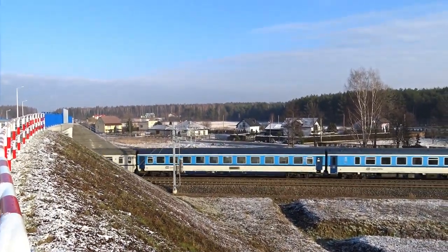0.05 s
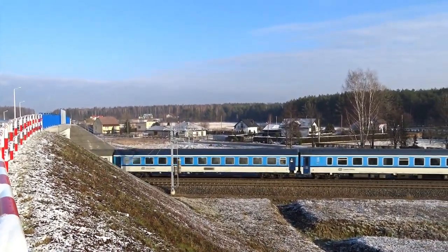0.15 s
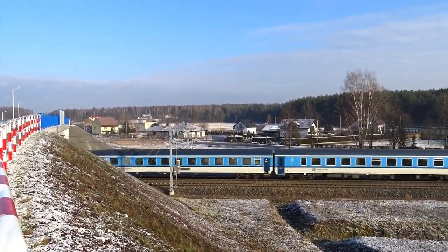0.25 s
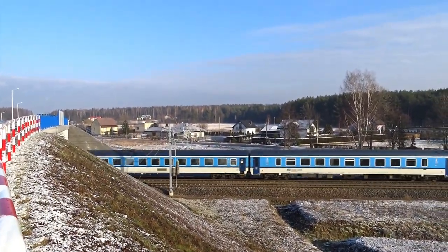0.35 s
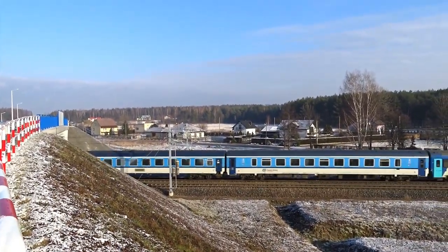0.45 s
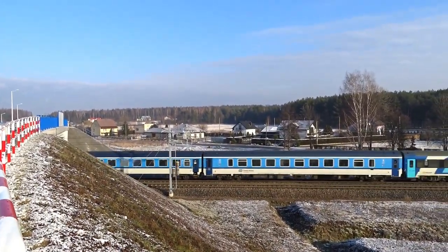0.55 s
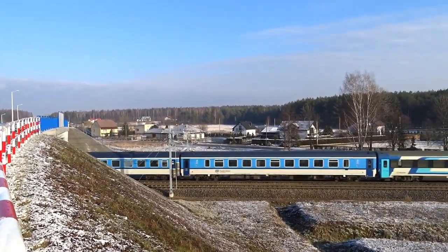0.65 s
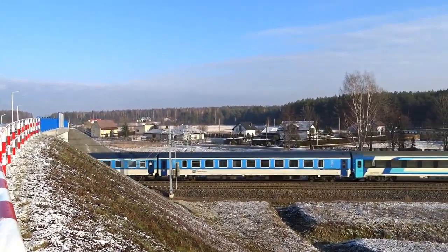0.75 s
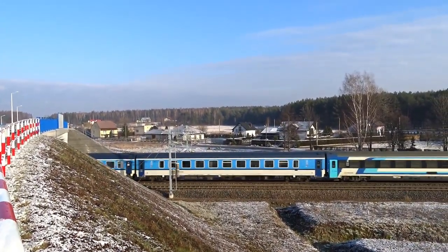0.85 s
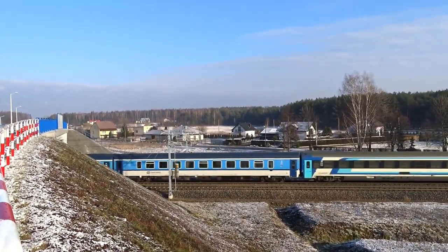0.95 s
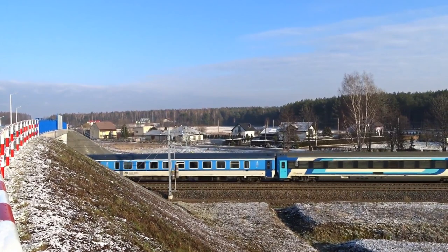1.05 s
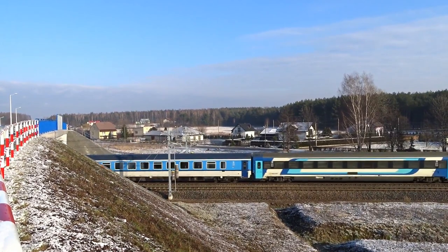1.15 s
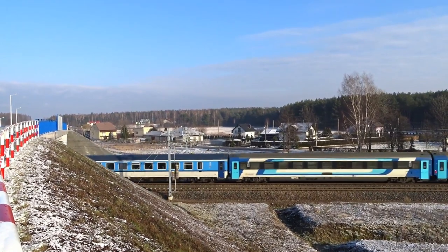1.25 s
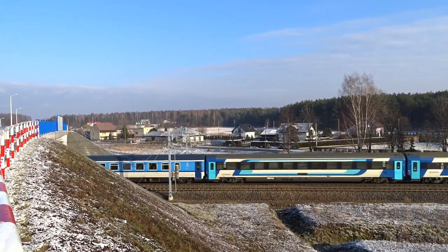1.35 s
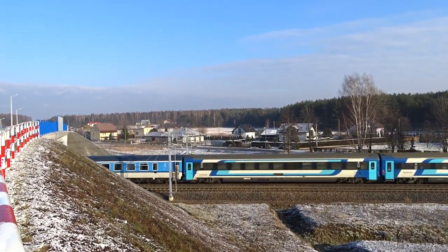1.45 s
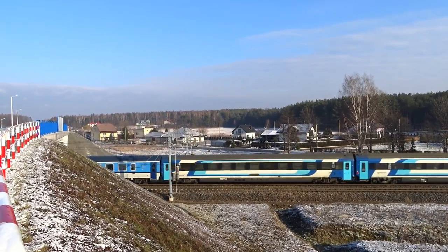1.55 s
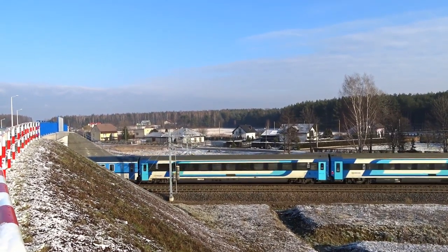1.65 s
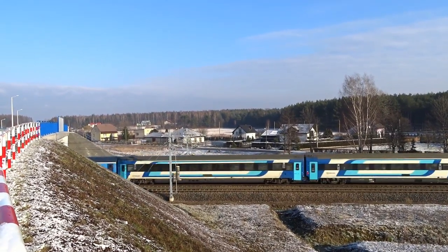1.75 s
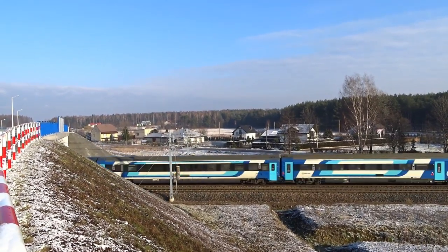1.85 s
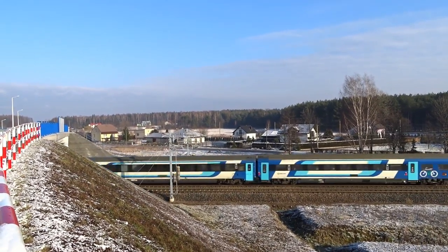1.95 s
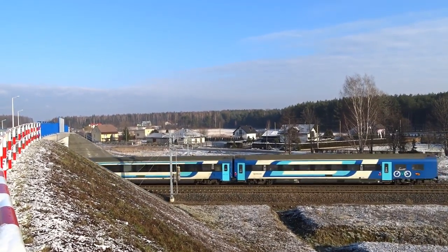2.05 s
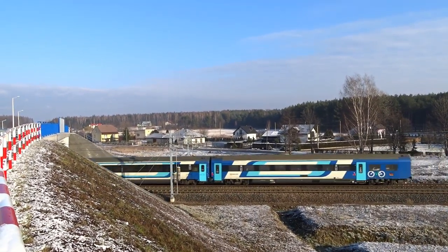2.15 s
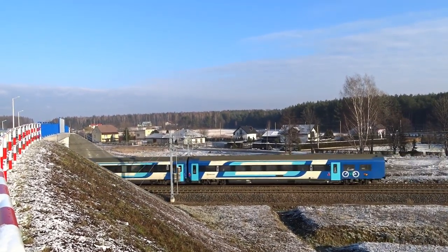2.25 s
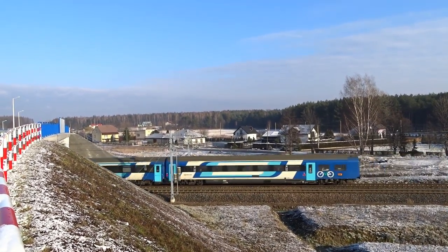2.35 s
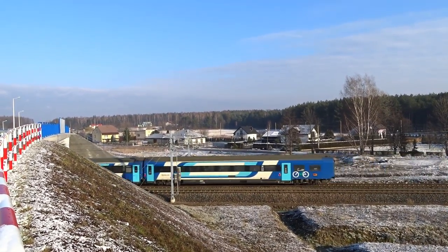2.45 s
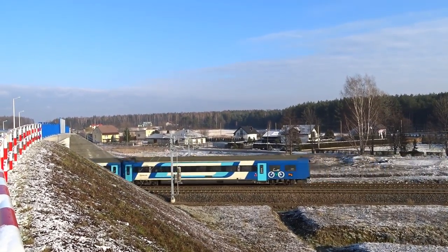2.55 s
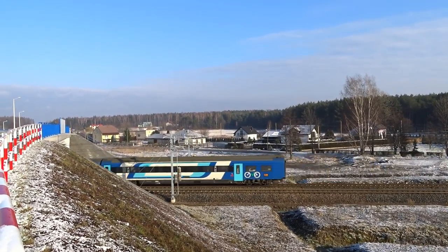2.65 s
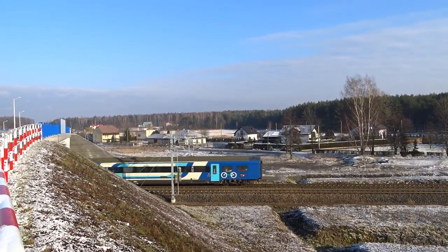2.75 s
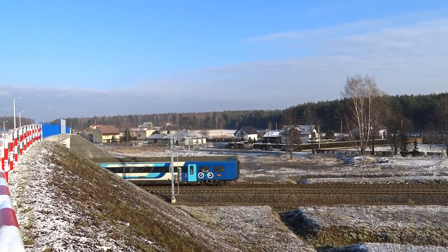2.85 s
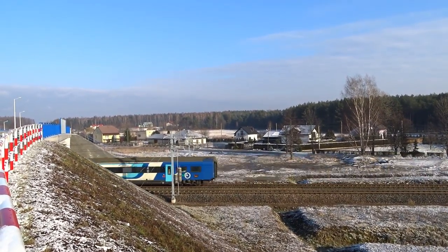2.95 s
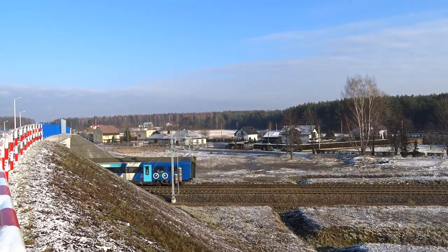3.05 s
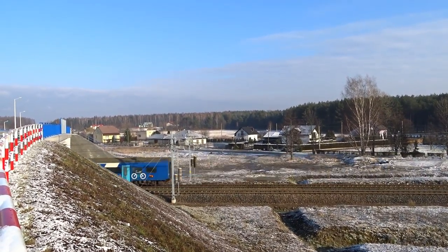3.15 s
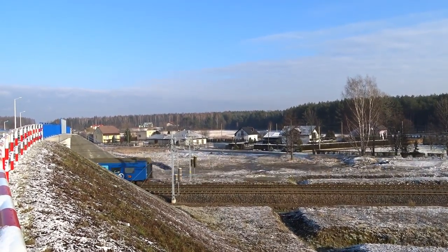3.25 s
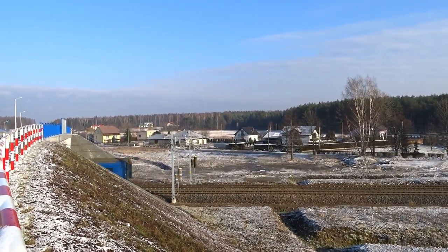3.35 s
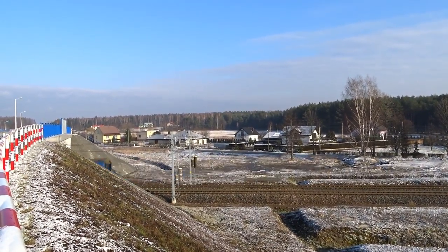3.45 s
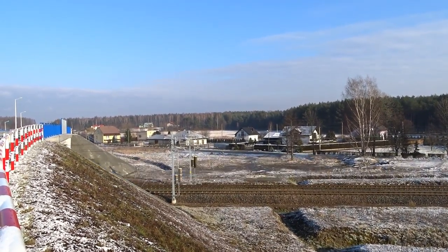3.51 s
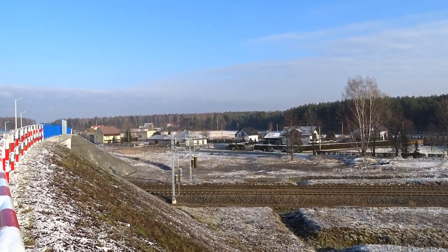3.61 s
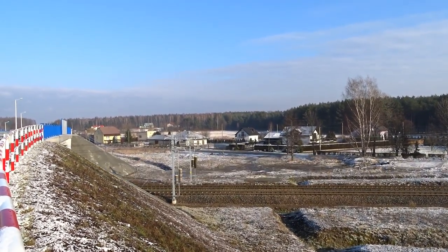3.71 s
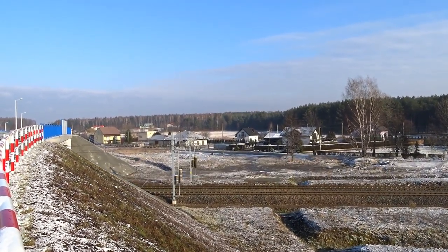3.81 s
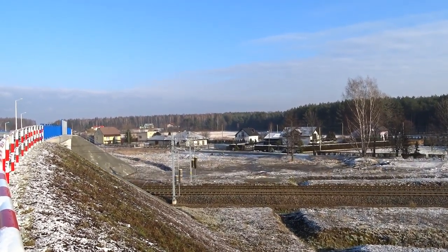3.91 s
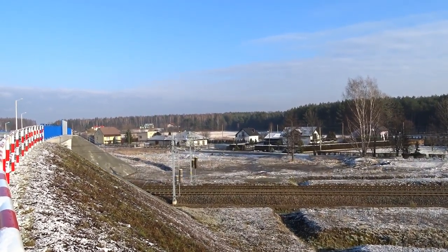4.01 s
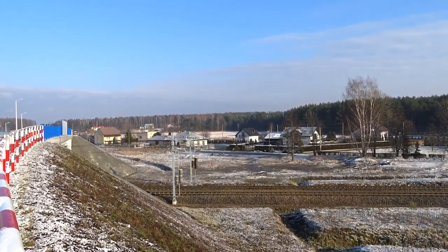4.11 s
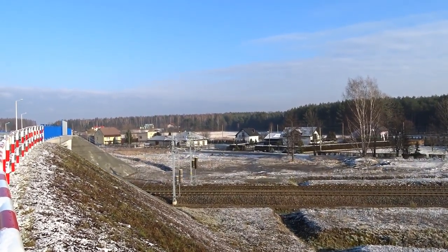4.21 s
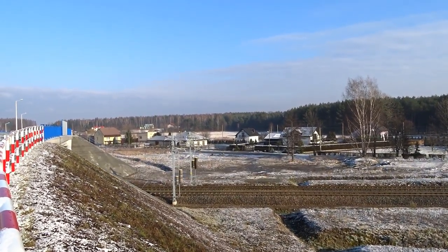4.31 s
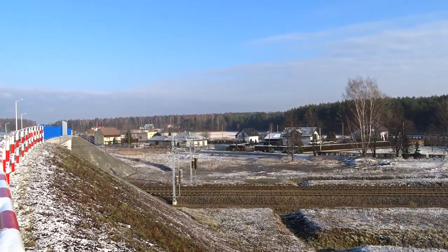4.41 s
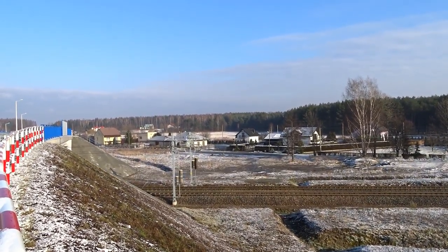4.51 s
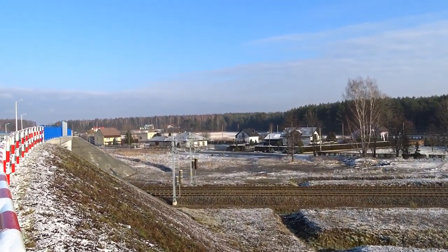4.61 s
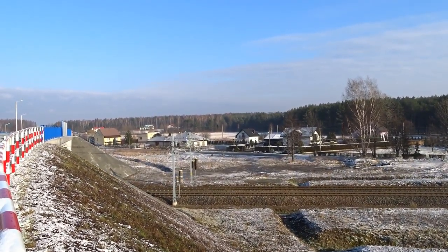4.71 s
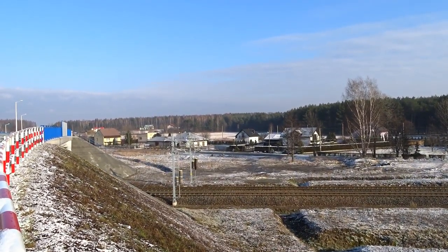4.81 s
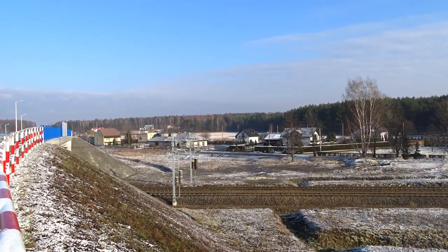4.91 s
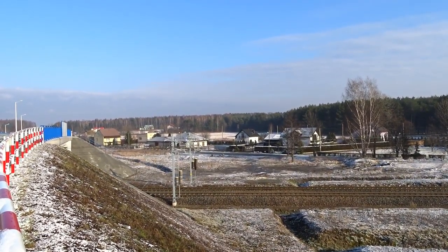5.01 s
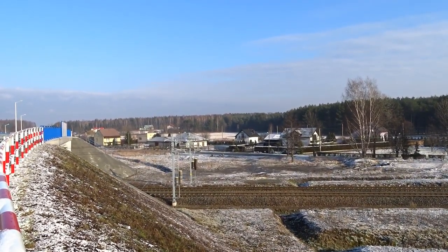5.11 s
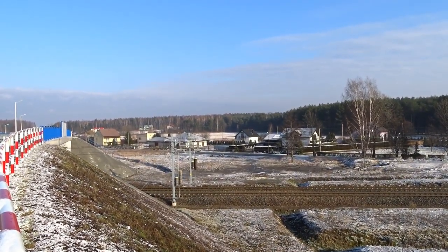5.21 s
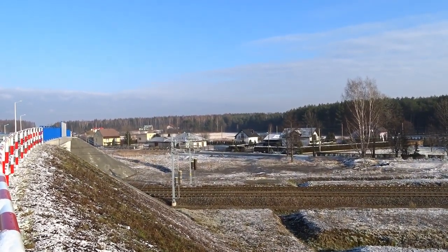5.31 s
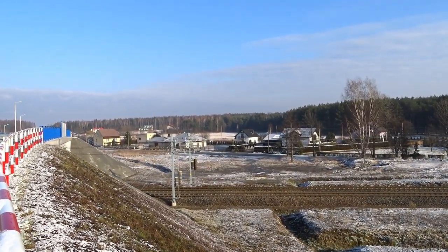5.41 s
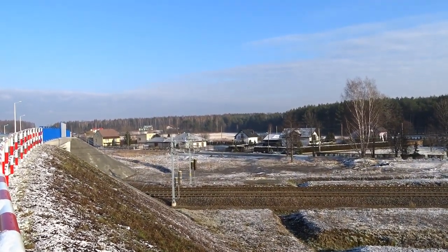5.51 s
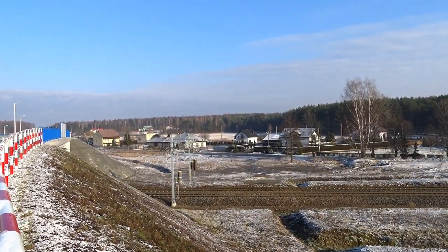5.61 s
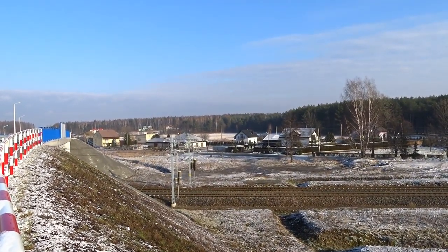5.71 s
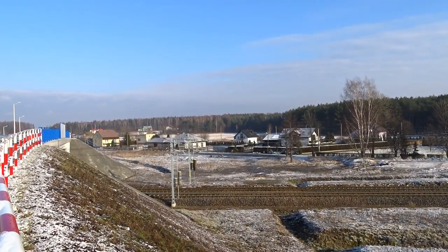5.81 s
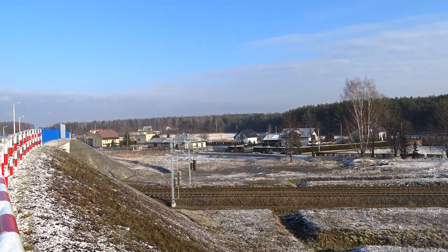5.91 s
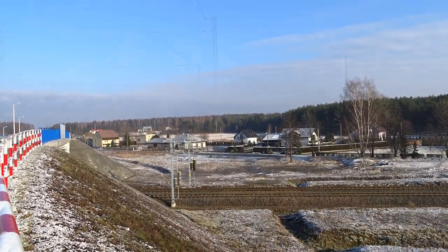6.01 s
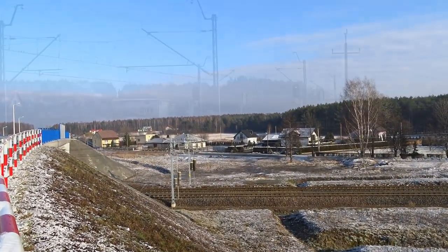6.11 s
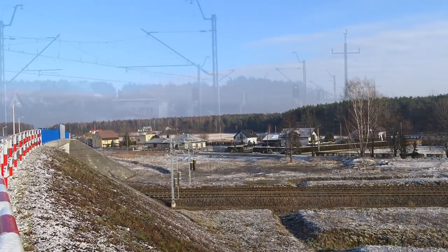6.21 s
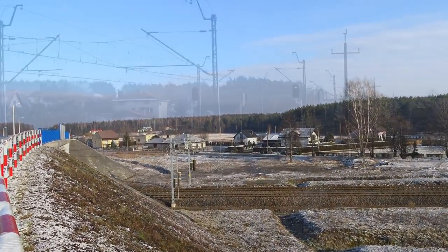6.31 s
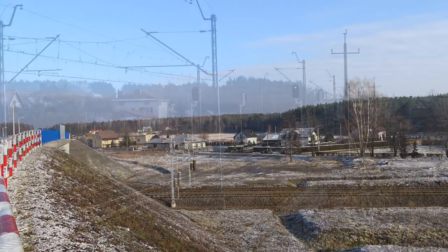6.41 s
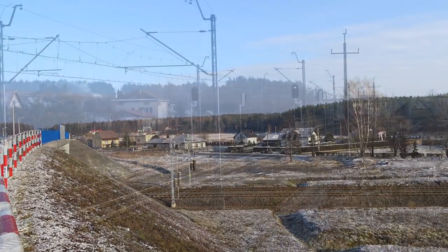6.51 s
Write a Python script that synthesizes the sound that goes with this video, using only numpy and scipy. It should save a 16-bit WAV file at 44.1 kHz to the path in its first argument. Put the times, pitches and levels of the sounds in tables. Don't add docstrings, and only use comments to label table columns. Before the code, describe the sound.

From the start a fast train is in full passage across open ground, heard from a moderate distance with a stereo microphone. Until about 1.8 seconds older coaches give a boomy, rough mid-low roar under dense bright wheel hiss; then newer coaches sound less boomy, with clearer metallic ringing around two kilohertz. Individual axles hum and wheel discs give brief faint squeals and howls, sagging in pitch. The noise stays loud and slightly mottled, drifting leftward, until about 3 seconds, then drops steeply to 3.5 as the last coach slips behind the embankment. A dull, hollow roar with a low drone remains, with a soft thump at 4.4 and swells near 5.1 and 5.5. Thin rail hiss and narrow high whistles waver and recede. Faint grass rustles appear at 4.6, crackles at 5.5, a sharp dry tick at 5.96 and dull brushes at 6.1. Everything fades almost away by 6.5.

```python
import sys
import numpy as np
from scipy import signal
from scipy.io import wavfile
from scipy.ndimage import uniform_filter1d

SR = 44100
rng = np.random.default_rng(int(sys.argv[2]) if len(sys.argv) > 2 else 0)


def transcribe(u):
    v = np.clip(np.atleast_2d(u).T, -1, 1)
    q = np.round(v * 32767).astype(np.int16)
    wavfile.write(sys.argv[1], SR, q)


def boost(x):
    u = np.asarray(x, float) / 20
    return 10 ** u


N = 289320
FRAME, HOP = 2048, 256
HZ = np.fft.rfftfreq(FRAME, 1 / SR)
S = np.arange(-(-N // HOP) + 1) * HOP / SR

# t/s, level/dB, share of older, boomier coaches [0-1]
IN_VIEW = [
    (0, 0, 0.9),
    (.5, -0.5, 1),
    (1.3, 0, 0.99),
    (1.8, 1.5, 0.54),
    (2.3, 1, 0.22),
    (2.65, 1, 0),
    (2.85, -1, 0.31),
    (3.3, -3, 0),
    (3.5, -9.5, .2),
    (3.9, -16.5, 0.11),
]
# f/Hz, level/dB per Hz
SLEEPERS = [(15, -53), (25, -36), (102, -16.5), (157, -12), (243, -6), (297, -6.5), (419, -8.5), (539, -7),
            (600, -9), (780, -21), (1320, -120)]
# f/Hz, level/dB per Hz
TRACK = [(300, -24), (480, -18.5), (620, 9), (760, 13), (900, 7), (1050, 5), (1500, -37)]
# f/Hz, level/dB per Hz
DISCS = [(530, -17.5), (900, -48), (1090, -9), (1520, 2.5), (2080, -8), (2310, 3.5), (2600, -6), (3110, -9),
         (4500, -13.5), (6150, -19.5), (7270, -16.5), (9200, -25), (12500, -33.5), (14300, -41),
         (15700, -62)]
# f/Hz, width/Hz, level/dB
DISC_RINGS = [(1200, 130, -5.5), (1560, 140, -5), (1816, 280, -8), (2220, 34, -2.5), (2341, 60, 2),
              (2450, 43, -7), (2870, 160, -11.5), (3450, 200, -10.5), (4090, 60, -12), (4305, 74, -13.5),
              (4920, 220, -15), (5760, 450, -21.5), (6500, 170, -22), (7150, 160, -18.5), (7850, 210, -23),
              (8600, 160, -26.5)]
# t/s, length/s, f/Hz, level/dB
HUMS = [(.08, .42, 335, -27), (.4, .32, 333, -27), (.56, .5, 256, -19), (.55, .55, 293, -30),
        (0, .4, 1205, -33), (1.0, .25, 1205, -32), (1.0, .2, 1150, -33), (1.08, .55, 249, -31),
        (1.3, .35, 280, -30), (2.3, .5, 746, -25.5), (2.98, .32, 743, -27), (3.3, .25, 738, -32),
        (1.85, .35, 765, -29), (1.2, .25, 488, -32), (2.4, .4, 1165, -34), (2.6, .2, 1480, -30),
        (2.9, .3, 1870, -31), (3.1, .3, 1480, -31), (3.7, .7, 741, -45)]
# t/s, length/s, f/Hz, level/dB
SQUEALS = [(1.42, .28, 3720, -35), (1.66, .32, 3680, -32.5), (3.05, .28, 2975, -32), (3.22, .22, 2950, -37),
           (1.45, .22, 4900, -34), (2.15, .35, 4930, -37), (2.45, .2, 5230, -40), (2.45, .2, 6070, -44),
           (.2, .15, 4865, -40), (2.2, .45, 3670, -39), (2.55, .3, 5040, -43), (2.5, .28, 4025, -33.5),
           (2.54, .18, 4290, -35), (2.52, .28, 4455, -36), (2.8, .55, 4780, -39), (3.1, .22, 4372, -34),
           (3.25, .22, 4335, -40), (3.0, .45, 4080, -39), (3.55, .9, 2330, -47)]
# t/s, length/s, f/Hz, level/dB
HOWLS = [(1.2, .25, 690, -22.5), (1.22, .3, 590, -24.5), (2.25, .45, 4700, -37), (1.55, .3, 5700, -41),
         (1.7, .3, 770, -28), (0, .3, 1180, -29), (2.3, .35, 3520, -37), (3.0, .45, 2930, -37),
         (3.2, .35, 3460, -39), (3.25, .25, 5740, -45), (2.95, .6, 2345, -27), (3.4, .22, 1510, -38),
         (2.3, .5, 4350, -40)]
# t/s, length/s, f/Hz, level/dB
RAIL_SONGS = [
    (3.45, 0.65, 8190, -54.5),
    (4.1, .65, 8260, -64),
    (5.2, .7, 9000, -74),
    (5.9, .7, 9500, -73),
    (6.2, .3, 11950, -78),
    (3.3, 1, 6460, -53),
]
# rows as above, share of pitch lost [1/s], pitch over width [-]
SINGERS = [
    (HUMS, .012, 95),
    (SQUEALS, .03, 115),
    (HOWLS, .03, 28),
    (RAIL_SONGS, .003, 90),
]
# f/Hz, level/dB per Hz
BANK = [(15, -51), (25, -22), (152, -6.5), (210, -1), (851, -12.5), (1380, -12.5), (1860, -19.5),
        (2130, -15.5), (3950, -30.5), (5610, -38.5), (6240, -56), (7140, -37), (8170, -59), (9350, -40.5),
        (15600, -49)]
# f/Hz, width/Hz, level/dB
BANK_RINGS = [(655, 260, -1.5), (1200, 350, -11.5), (2200, 180, -9), (5570, 250, -21.5), (5730, 150, -20),
              (6500, 100, -23)]
# t/s, length/s, level/dB
DRONE_SWELLS = [
    (4.4, 0.097, 10),
    (5.12, 0.34, 6.5),
    (5.55, .25, 5.5),
]
# f/Hz, width/Hz, level/dB
WHISTLE = [(6760, 110, -6), (7010, 200, -6.5), (7250, 150, -2), (7400, 79, -2)]
# f/Hz, width/Hz, level/dB
RAIL_BANDS = [(8180, 60, -6), (8900, 80, -2), (9600, 150, -6), (10400, 110, -8), (11200, 110, -7),
              (11950, 130, -7), (12800, 250, -8), (13550, 230, -11), (14250, 230, -14)]
# f/Hz, level/dB per Hz
HAZE = [(5000, -40), (6200, -29), (7800, -23), (8400, -14), (10500, -17), (13000, -29), (15700, -38)]
# f/Hz, level/dB per Hz
HISS = [(1500, -13), (2300, -7), (3000, -2), (4200, 1), (5650, 1), (6100, -1), (7000, -4), (8300, -8),
        (10500, -26), (13000, -23), (15700, -39)]
# t/s, length/s, whistle level/dB, upper-band level/dB
RAIL_SWELLS = [
    (3.58, .2, 0, 5),
    (4.15, .25, 5, -1),
    (5.06, .22, 5, 2),
    (5.36, .16, 3, 6),
    (5.6, .2, -4, -3),
    (5.88, .35, 4, 6),
    (6.5, .45, -2, -10),
]
# t/s, level/dB, low f/Hz, high f/Hz, length/ms
RUSTLES = [
    (4.58, -60, 7500, 13000, 40),
    (5.5025, -50, 5000, 14000, 3),
    (5.526, -49, 800, 2500, 12),
    (5.92, -66, 8000, 13000, 90),
    (6.103, -49, 1800, 3300, 14),
    (6.13, -48.5, 1800, 3600, 20),
    (6.36, -62, 3500, 6000, 10),
]
# t/s, peak level/dB, f/Hz, length/ms
TICKS = [
    (5.5035, -40, 6500, 1.9),
    (5.9589, -35, 7200, 0.87),
    (5.9589, -40, 14900, .6),
    (5.9589, -44, 11000, .7),
]
# t/s, left minus right level/dB
SWEEP = [
    (0.0, -3),
    (2.3, -1.0),
    (3.98, 3),
    (4.26, 4),
    (5.64, 5),
    (6.34, 7.5),
    (6.56, 7),
]
# f/Hz, share [-]
AIMING = [(100, .05), (350, .25), (750, 0.61), (1500, 1.2), (3000, 0.78), (5500, 0.58), (7000, .02),
          (10000, 0.65)]
# f/Hz, likeness [0-1]
SAME = [(100, 0.99), (400, 0.98), (1000, 0.94), (2000, 0.91), (4000, 0.89), (6000, 0.96), (8500, 1),
        (10000, 0.92), (12000, 0.89)]
# f/Hz, lead/rad
LEAD = [(20, -.04), (90, 0.054), (300, -0.42), (1000, -0.79), (1500, -0.56), (3000, -0.041), (6000, -0.28),
        (10000, -0.45), (12000, -0.18)]
# f/Hz, likeness [0-1]
SAME_HIDDEN = [(100, 0.98), (400, 1), (1000, 0.98), (1700, 0.77), (2300, 0.87), (4000, 0.76), (6000, 0.97),
               (10000, 0.9), (12000, 0.9)]
# f/Hz, lead/rad
LEAD_HIDDEN = [(20, -.04), (90, -0.0076), (300, -.38), (1000, -0.96), (1400, -0.71), (1750, -1.24),
               (3000, -0.26), (6000, 0.2), (12000, -.02)]

RUMBLE_DB, RUMBLE_FOLLOWS, RUMBLE_OLDER_DB = -32.5, 0.15, 8.0
TRACK_DB, TRACK_FOLLOWS, TRACK_OLDER_DB = -27.5, 0.8, 6.5
DISCS_DB, DISCS_OLDER_DB = -19.0, -0.75
HUMP_HZ, HUMP_SINK_HZ_PER_S = 283, 19.7
BOUNCE_HZ = 747
GONE_S = 3.526
FADE_S, FADE_DB_PER_S2 = 5.54, -3.5
ROAR_DB, ROAR_DB_PER_S = -32, -1.93
DRONE_DB, DRONE_DB_PER_S, DRONE_HZ = -37, -5, 213
WHISTLE_DB, WHISTLE_DB_PER_S = -47.0, -5
BANDS_DB, BANDS_DB_PER_S = -51.5, -7.0
HISS_DB, HISS_DB_PER_S, LAST_WHEELS_DB_PER_S = -43.5, -10, -39


def coaches():
    view_db, older = curves(IN_VIEW)
    hump_hz = HUMP_HZ - HUMP_SINK_HZ_PER_S * S
    hump = boost(8.5) / (1 + ((HZ[:, None] - hump_hz) / 45.0) ** 2)
    rumble_db = RUMBLE_DB + RUMBLE_FOLLOWS * view_db + RUMBLE_OLDER_DB * older
    rumble = layer(boost(2 * read(SLEEPERS)) * (1 + hump ** 2), rumble_db)
    track_db = TRACK_DB + TRACK_FOLLOWS * view_db + TRACK_OLDER_DB * older
    track = layer(boost(2 * read(TRACK)), track_db)
    between_db = np.interp(S, [2.0, 2.7], [-6.5, -10.0])
    between = boost(2 * (read(DISCS) + between_db))
    ringing = rings(DISC_RINGS, waver_db=1.3, seconds=0.2)
    discs = layer(between + ringing, DISCS_DB + view_db + DISCS_OLDER_DB * older)
    bounce = np.clip((HZ - 8000) / 9000, 0, .6) * np.cos(2 * np.pi * HZ / BOUNCE_HZ)
    discs = discs * (1 + bounce[:, None]) ** 2
    in_sight = np.clip((3.95 - S) / 0.63, 0, 1)
    return (rumble + track + discs) * in_sight ** 2


def songs():
    out = np.zeros((2, N))
    for rows, sink, sharp in SINGERS:
        for s, length, hz, db in rows:
            n, start = round(min(length, 1) * SR), round(s * SR)
            width_hz = hz / sharp
            pole = np.exp(-np.pi * width_hz / SR)
            noise = rng.standard_normal((SR, 4)).T
            shake = evened(signal.lfilter([1], [1, -2 * pole, pole ** 2], noise))[:, -n:]
            steady = 26 / width_hz
            pitch_hz = hz * (1 - sink * np.arange(n) / SR)
            turn = np.exp(2j * np.pi * np.cumsum(pitch_hz) / SR)
            ring = ((steady + shake[:2] + 1j * shake[2:]) * turn).real
            ring = ring / np.sqrt(1 + steady ** 2 / 2)
            out[:, start:start + n] += boost(db) * (ring * np.hanning(n) ** .6)[:, :N - start]
    return out


def behind_bank():
    drone_db = receding(DRONE_DB, DRONE_DB_PER_S) + swells(DRONE_SWELLS)[0]
    ringing = boost(-14.0) * rings(BANK_RINGS, waver_db=-2.0, seconds=0.32)
    roar = layer(boost(2 * read(BANK)) + ringing, receding(ROAR_DB, ROAR_DB_PER_S))
    drone = layer(1 / (1 + ((HZ[:, None] - DRONE_HZ) / 22) ** 2) ** 2, drone_db)
    return (roar + drone) * np.clip((S - 3.35) / 0.33, 0, 1) ** 2


def rail():
    whistle_db, bands_db = swells(RAIL_SWELLS)
    whistle_db = whistle_db + receding(WHISTLE_DB, WHISTLE_DB_PER_S)
    bands_db = bands_db + receding(BANDS_DB, BANDS_DB_PER_S)
    last_wheels_db = LAST_WHEELS_DB_PER_S * np.clip(S - GONE_S, -.4, 0)
    hiss_db = receding(HISS_DB, HISS_DB_PER_S) + last_wheels_db
    whistle = layer(rings(WHISTLE, waver_db=3.5, seconds=0.17), whistle_db)
    haze = boost(2 * read(HAZE) + 7.0)
    bands = layer(rings(RAIL_BANDS, waver_db=2.5, seconds=0.25) + haze, bands_db)
    hiss = layer(boost(2 * read(HISS)), hiss_db)
    return (whistle + bands + hiss) * np.clip((S - 3.0) / 0.49, 0, 1) ** 2


def rolling():
    gusts_db = chance(count=1, bins=1, seconds=.03) * np.clip(HZ / 8800.0, 0, 1)[:, None]
    patches_db = chance(count=len(HZ), bins=14, seconds=.03) * np.clip(HZ / 1760.0, .2, 1)[:, None]
    size = np.sqrt(coaches() + behind_bank() + rail()) * boost(gusts_db + patches_db)
    return to_sound(to_frames(rng.standard_normal((2, N))) * size)


def rustles():
    out = np.zeros(N)
    t = np.arange(-4000, 4000) / SR
    for s, db, low_hz, high_hz, ms in RUSTLES:
        band = signal.butter(2, [low_hz, high_hz], "band", fs=SR, output="sos")
        noise = evened(signal.sosfilt(band, rng.standard_normal(len(t))))
        out[round(s * SR) - 4000:][:len(t)] += boost(db) * noise * np.exp(-(t / (ms / 2000)) ** 2)
    return out


def ticks():
    out = np.zeros(N)
    t = np.arange(-200, 400) / SR
    for s, db, hz, ms in TICKS:
        shape = np.exp(-(t / (ms / 2000)) ** 2) * np.cos(2 * np.pi * hz * t * (1 + 60 * t))
        out[round(s * SR) - 200:][:len(t)] += boost(db) * shape
    return out


def ports(pair):
    a, b = to_frames(pair)
    hidden = np.clip((S - 3.4) / 2.0, 0, 1)
    same = read(SAME) + hidden * (read(SAME_HIDDEN) - read(SAME))
    lead = read(LEAD) + hidden * (read(LEAD_HIDDEN) - read(LEAD))
    half_angle = np.arccos(np.clip(same, 0, 1)) / 2
    tilt = boost(read(AIMING) * curves(SWEEP)[0] / 2) * np.exp(.5j * lead)
    shared, apart = np.cos(half_angle) * a, np.sin(half_angle) * b
    return to_sound(np.array([(shared + apart) * tilt, (shared - apart) / tilt]))


def to_frames(x):
    return signal.stft(x, nperseg=FRAME, noverlap=FRAME - HOP)[2]


def to_sound(z):
    return signal.istft(z, nperseg=FRAME, noverlap=FRAME - HOP)[1][:, :N]


def evened(x):
    return x / np.sqrt(np.mean(x ** 2) + 1e-20)


def read(points):
    f, value = np.transpose(points)
    return np.interp(np.log(HZ + 1), np.log(f + 1), value)[:, None]


def curves(rows):
    s, *columns = np.transpose(rows)
    return [uniform_filter1d(np.interp(S, s, c), 12) for c in columns]


def swells(rows):
    s, length, *db = np.transpose(rows)
    return np.array(db) @ np.exp(-(2 * (S - s[:, None]) / length[:, None]) ** 2)


def receding(db, db_per_s):
    return db + db_per_s * (S - GONE_S) + FADE_DB_PER_S2 * np.maximum(S - FADE_S, 0) ** 2


def chance(count, bins, seconds):
    field = rng.standard_normal((len(S), count)).T
    frames = max(round(seconds * SR / HOP), 1)
    for _ in range(2):
        field = uniform_filter1d(field, frames, 1)
        field = uniform_filter1d(field, bins, 0)
    return evened(field)


def rings(modes, waver_db, seconds):
    hz, width, db = np.transpose(modes)
    shape = boost(db) / (1 + (2 * (HZ[:, None] - hz) / width) ** 2)
    return shape ** 2 @ boost(2 * waver_db * chance(count=len(modes), bins=1, seconds=seconds))


def layer(power, db):
    mean_power = power.mean(0) + 0 * S
    return power / uniform_filter1d(mean_power, 40) * boost(2 * db)


def scene():
    return ports(rolling() + songs()) + ticks() + rustles()


def low_pass(x):
    return signal.sosfilt(signal.butter(12, 15750, fs=SR, output="sos"), x)


def record(dry):
    return low_pass(dry)


dry = scene()
out = record(dry)
transcribe(out)
```